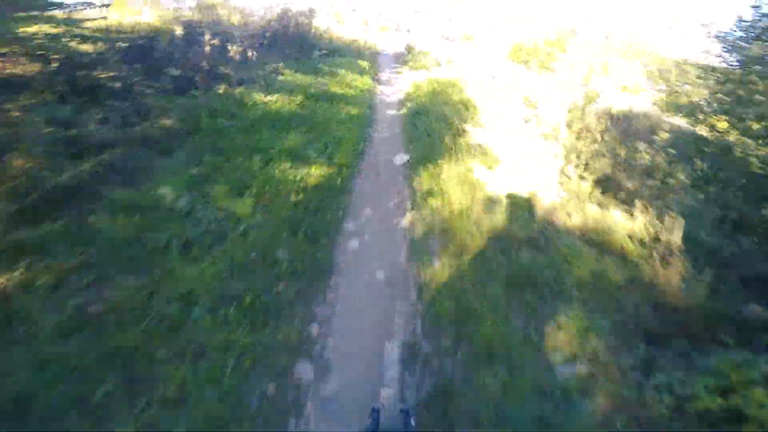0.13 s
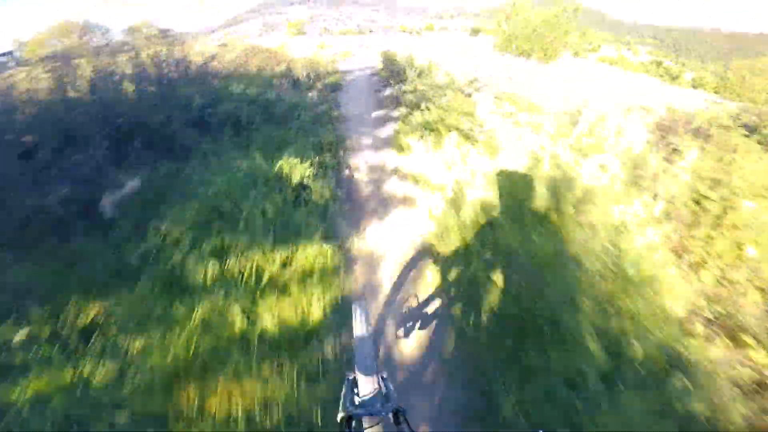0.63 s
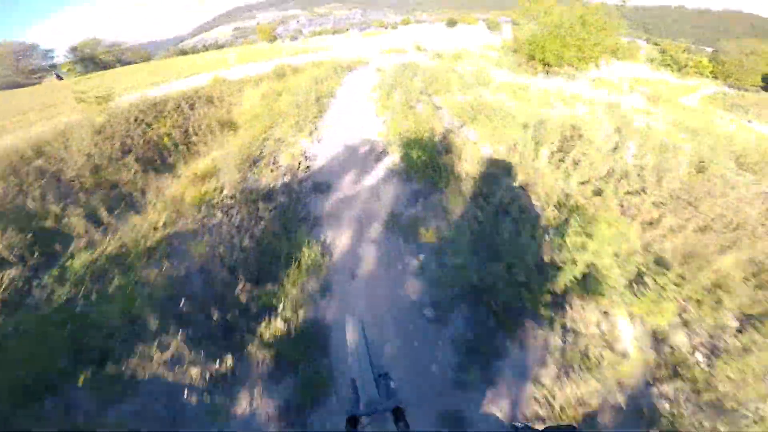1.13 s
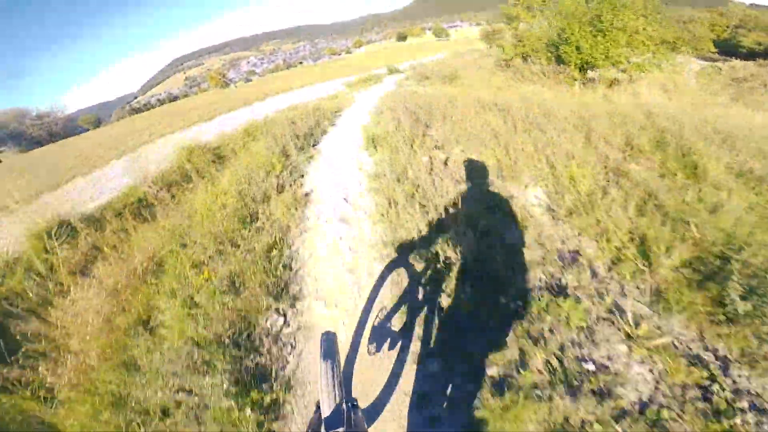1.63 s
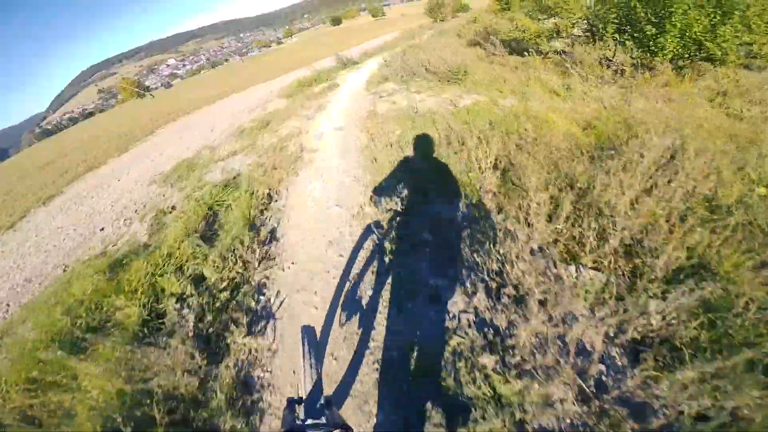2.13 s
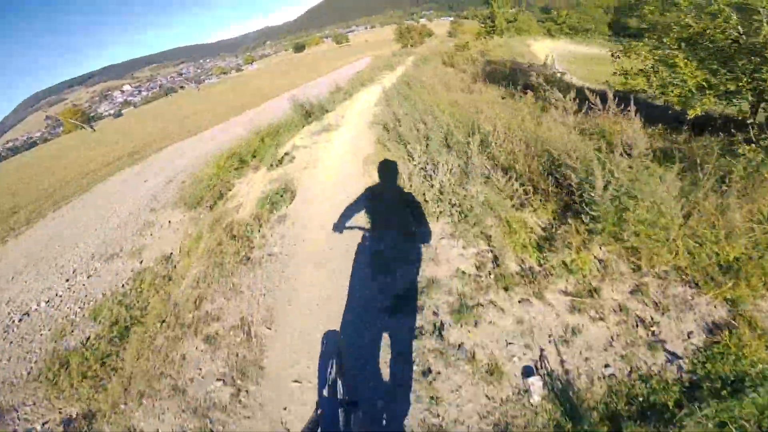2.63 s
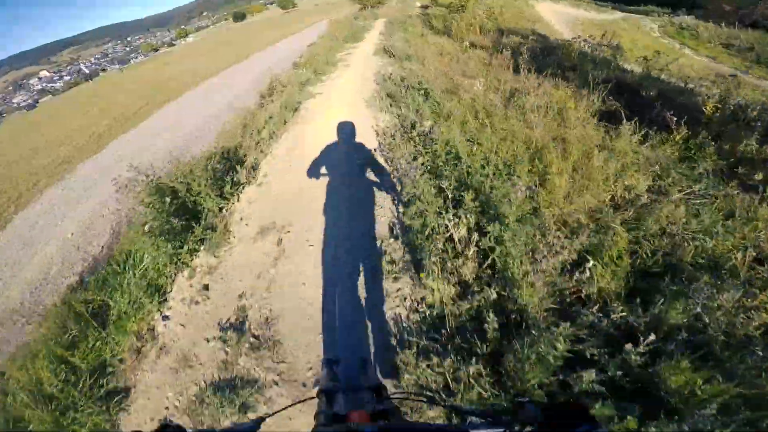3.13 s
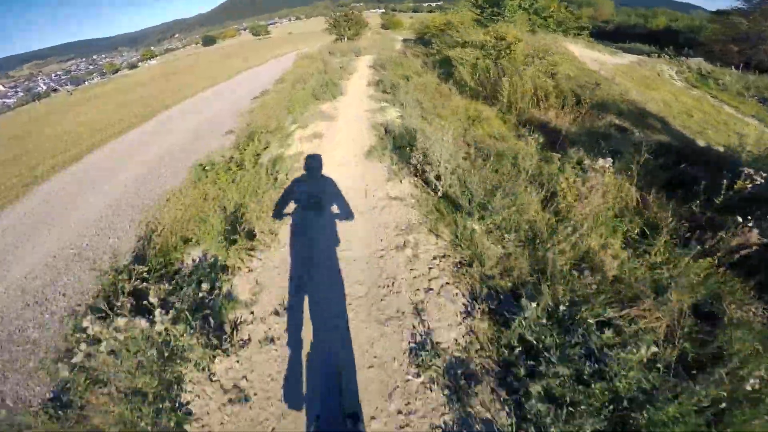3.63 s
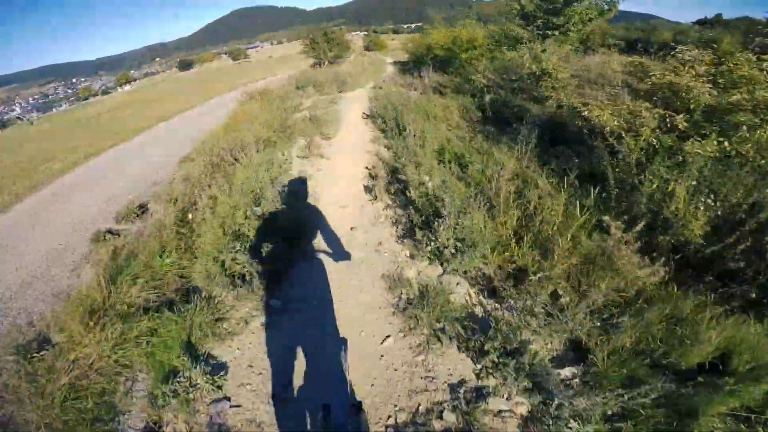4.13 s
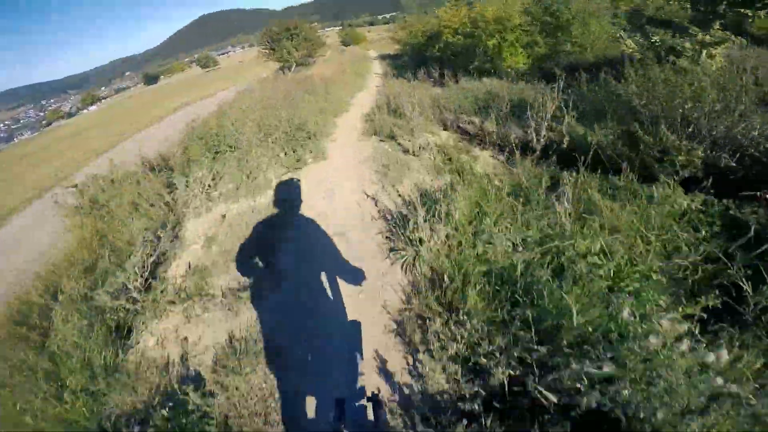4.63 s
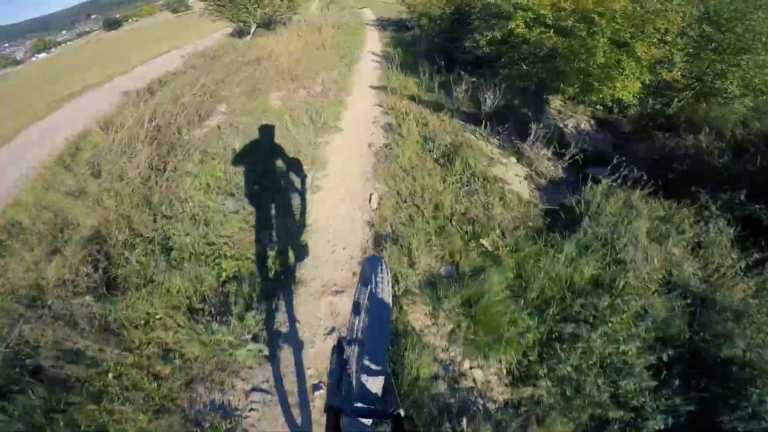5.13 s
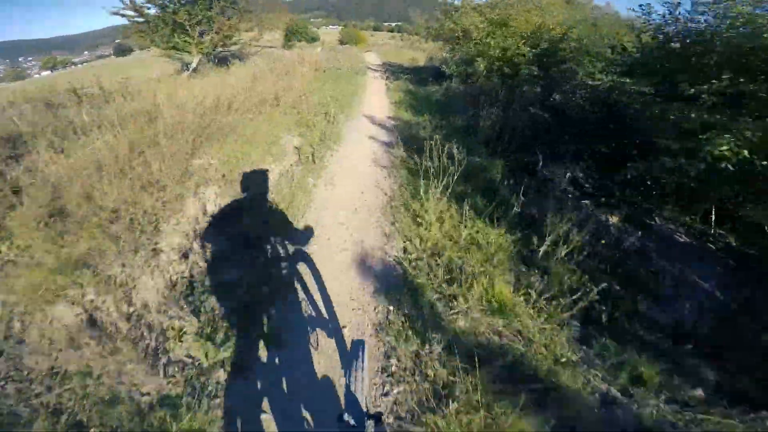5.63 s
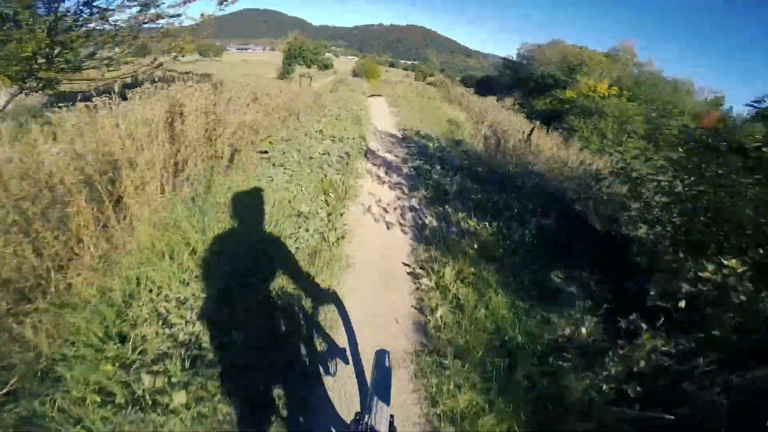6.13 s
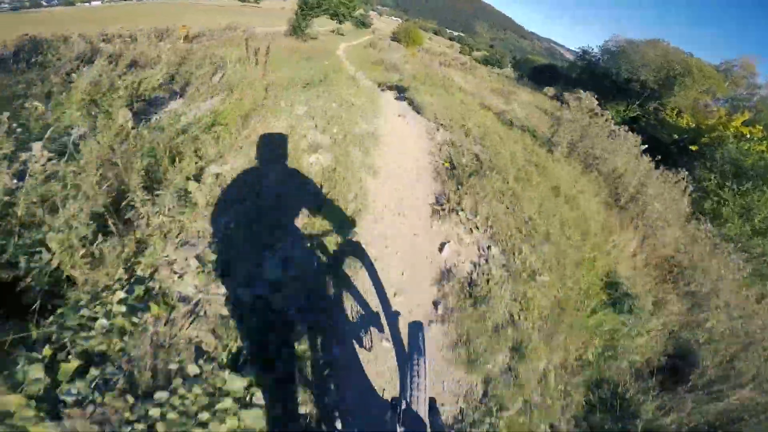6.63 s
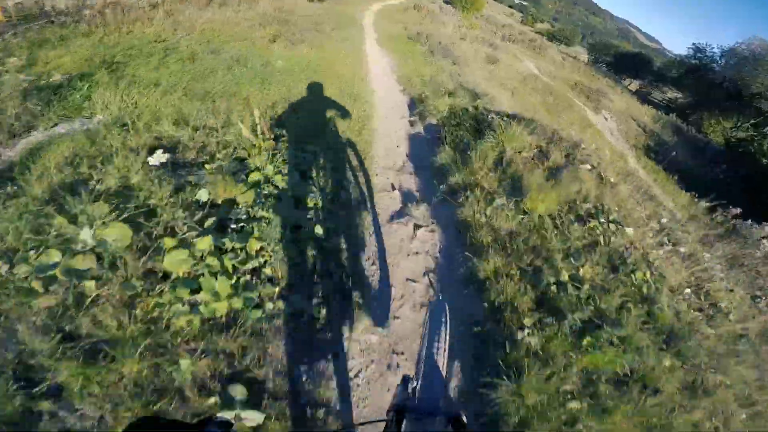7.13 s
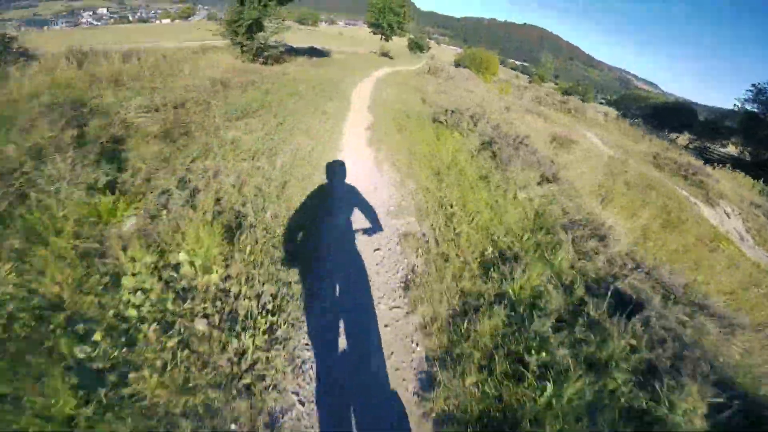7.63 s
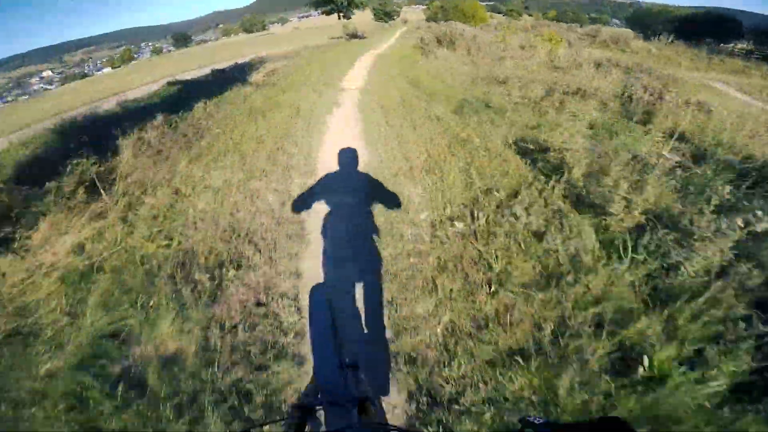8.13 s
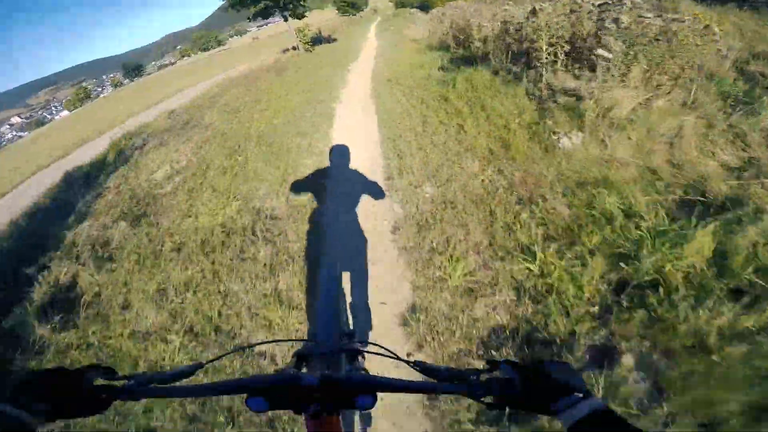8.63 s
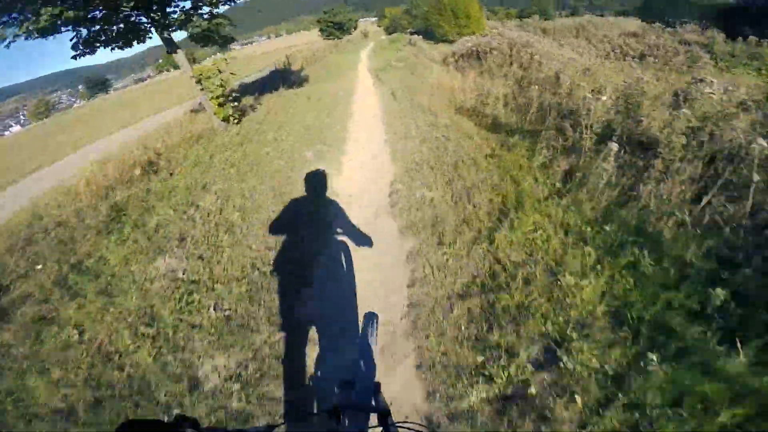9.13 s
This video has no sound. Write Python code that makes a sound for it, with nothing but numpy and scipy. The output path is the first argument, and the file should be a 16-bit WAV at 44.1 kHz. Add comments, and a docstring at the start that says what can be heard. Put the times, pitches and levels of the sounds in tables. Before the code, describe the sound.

Fast mountain bike ride heard from the rider: low throbbing wind, hissing tyres on gravel, chain rattle and irregular clacks and clinks.

```python
"""Mountain bike on a dirt trail

A bike runs fast downhill, heard from a small camera on the rider. Wind is noise shaped by spectra
and moving levels: it rumbles, throbs and buffets, with low puffs and short gritty scrapes on top.
The tyres roar and hiss as patchy short-time noise. Chain, grit and stones clatter on the frame:
short noise bursts excite decaying resonances, in single loud blows and in a random patter that
thickens as the gravel crunch grows louder."""
import sys
import numpy as np
from scipy import signal
from scipy.fft import rfft, irfft, next_fast_len
from scipy.io import wavfile
from scipy.ndimage import uniform_filter1d

SR = 44100
rng = np.random.default_rng(int(sys.argv[2]) if len(sys.argv) > 2 else 0)


def pcm_store(signal):
    """Save signal as 16-bit PCM."""
    levels = np.round(np.clip(np.atleast_2d(signal), -1, 1) * 32767)
    wavfile.write(sys.argv[1], SR, levels.astype(np.int16).T)


def how_loud(loudness_db):
    """Turn decibels into a plain amplitude multiplier (0 dB gives 1, 20 dB gives 10)."""
    steps = np.asarray(loudness_db, float) / 20
    return 10 ** steps


N = 408366  # samples

# levels of wind buffeting and of gravel crunch: start_s, buffet_db, crunch_db
BUFFET_AND_CRUNCH = [(0.0, -33, -31), (0.2, -21, -33), (0.3, -23, -37.5), (0.5, -32, -42), (1.31, -34, -38),
                     (1.38, -27.5, -31), (1.62, -31.5, -35.5), (1.94, -36, -41), (2.05, -22.5, -35.5),
                     (2.27, -26.5, -35), (2.53, -24.5, -42), (3.25, -28.5, -39), (3.53, -18.5, -28.5),
                     (3.87, -28, -42), (4.13, -21, -34.5), (4.28, -26, -37), (4.32, -20, -32),
                     (4.58, -23.5, -36), (4.72, -32, -38), (5.16, -27.5, -44), (5.31, -23, -32),
                     (5.42, -25.5, -25), (5.62, -28, -33), (5.88, -21, -27), (6.03, -28, -30.5),
                     (6.37, -27, -40), (7.07, -20, -29.5), (7.71, -26, -29), (8.15, -26, -35),
                     (8.52, -31.5, -31.5), (8.66, -34, -43.5), (9.03, -31.5, -27.5), (9.26, -31, -41.5)]


def evened(x):
    """Normalises the mean power: rms 1."""
    return x / np.sqrt(np.mean(x ** 2) + 1e-20)


def read(points, hz):
    """Interpolates a spectrum on a log-frequency axis, as hearing spaces pitch."""
    f, value = np.transpose(points)
    return np.interp(np.log(hz + 1), np.log(f + 1), value)


def filtered(x, points):
    """Linear filtering: the spectrum of x is multiplied by a gain curve of (Hz, dB) points."""
    size = next_fast_len(len(x))
    gain = how_loud(read(points, np.fft.rfftfreq(size, 1 / SR)))
    return irfft(rfft(x, size) * gain, size)[:len(x)]


def coloured_noise(points, envelope=1):
    """Subtractive synthesis: white noise under an envelope, filtered by a spectrum, rms 1."""
    return evened(filtered(rng.standard_normal(N) * envelope, points))


def lumps(seconds):
    """Low-passed randomness: noise averaged twice over the given time, rms 1."""
    span = max(round(seconds * SR), 2)
    once = uniform_filter1d(rng.standard_normal(N), span)
    return evened(uniform_filter1d(once, span))


def follow(table):
    """Piecewise-linear envelopes: the columns of a table, sample by sample."""
    s, *columns = np.transpose(table)
    return [np.interp(np.arange(N) / SR, s, c) for c in columns]


def add(mix, s, sound):
    """Superposition: mixes a sound in at second s."""
    part = mix[round(s * SR):][:len(sound)]
    part += sound[:len(part)]


def gliding(x, octaves, seconds):
    """Frozen turbulence: eddies pass faster or slower as air speed wanders, so their pitch glides."""
    speed = 2 ** (octaves * lumps(seconds))
    return np.interp(np.cumsum(speed) * (N - 1) / speed.sum(), np.arange(N), x)


def wind(gust):
    """Turbulent pressure on the microphone: large eddies rumble, smaller ones throb."""
    # wind strength: start_s, rumble_db, throb_db
    wind_levels = [(0.0, -19.5, -23), (2.5, -19, -18.5), (2.73, -17, -11), (2.84, -17.5, -22.5),
                   (3.22, -25.5, -17.5), (3.51, -14.5, -20.5), (4.18, -19.5, -19.5), (4.33, -17, -18.5),
                   (5.08, -22, -21), (5.31, -18, -14.5), (6.5, -18.5, -21), (6.83, -25, -13),
                   (7.14, -12.5, -18), (7.4, -17.5, -20.5), (7.79, -13, -16), (8.79, -19.5, -21),
                   (8.85, -13.5, -17), (9.26, -14.5, -19)]
    # spectrum of the large eddies: frequency_hz, level_db
    rumble_spectrum = [(12, -39), (22, -12), (40, 5), (60, 4.5), (85, -4.5), (130, -14.5), (300, -104)]
    # spectrum of the smaller eddies: frequency_hz, level_db
    throb_spectrum = [(50, -22), (85, -2), (120, -1), (190, -14), (300, -21.5), (700, -107)]
    rumble_db, throb_db = follow(wind_levels)
    rumble = coloured_noise(rumble_spectrum)
    throb = gliding(coloured_noise(throb_spectrum), octaves=0.3, seconds=0.16)
    throb = evened(throb * how_loud(2.0 * gust))
    return how_loud(rumble_db) * rumble + how_loud(throb_db) * throb


def buffeting_and_crunch(gust):
    """Amplitude-modulated noise: wind buffeting and gravel crunch in uneven lumps, partly together."""
    # spectrum of the buffeting: frequency_hz, level_db
    buffet_spectrum = [(95, -38.5), (175, 0), (400, -9), (800, -20), (1500, -33), (4000, -75)]
    # spectrum of the gravel crunch: frequency_hz, level_db
    crunch_spectrum = [(400, -2), (750, -4), (1100, -3.5), (1500, -7.5), (2200, -29), (5000, -73)]
    buffet_db, crunch_db = follow(BUFFET_AND_CRUNCH)
    jolt = lumps(0.0034)  # shared by both
    buffet = coloured_noise(buffet_spectrum, how_loud(1.67 * jolt))
    buffet = evened(gliding(buffet, octaves=0.3, seconds=0.07) * how_loud(2.45 * gust))
    unevenness_db = 0.36 * jolt + 1.66 * lumps(0.0036) + 0.83 * gust + 1.0 * lumps(0.061)
    crunch = coloured_noise(crunch_spectrum, how_loud(unevenness_db))
    return how_loud(buffet_db) * buffet + how_loud(crunch_db) * crunch


def puffs_and_scrapes():
    """Enveloped noise: low puffs of wind and short gritty scrapes, each swelling with a sharper edge."""
    # swelling bursts: start_s, peak_db, edge_db (sets the treble of the burst), rise_ms
    bursts = [(0.64, -11, -16, 8.4), (0.665, -9.5, -16.5, 5.9), (0.685, -12, -8, 4.4),
              (1.011, -12, -31, 3.2), (1.359, -13.5, -7, 5.9), (1.383, -5.5, -13, 2.5),
              (1.411, -10.5, -20, 3.2), (1.45, -6, -12, 2.4), (1.622, -5, -14, 2.8), (2.038, -12, -29, 5),
              (2.271, -13, -7, 5.8), (2.293, -10, -24, 2.1), (2.425, -9.5, -7, 5.6),
              (2.709, -6.5, -16, 7.4), (3.473, -7, -19, 5.5), (3.493, -4.5, -5, 3), (3.557, -2.5, -16, 2.8),
              (3.712, -12, -11, 6.7), (3.972, -7.5, -19, 1.4), (4.134, -0.5, -40, 11), (4.303, -12, -14, 2),
              (4.315, -12, -11, 1.9), (4.333, -12, -15, 3.1), (4.428, -17, -5, 4), (4.471, -10.5, -13, 3.4),
              (4.517, -2.5, -37, 8.6), (4.966, -12.5, -25, 5), (5.326, -5.5, -24, 6),
              (5.362, -4.5, -16, 1.5), (5.387, -8, -15, 4.2), (5.521, -5, -17, 2.8), (5.538, -3, -26, 9.7),
              (5.677, -5.5, -19, 4.5), (5.892, -1.5, -11.5, 4.7), (5.928, -8, 0, 8.6), (5.942, 0, -8, 2.7),
              (5.965, -6, -3, 2.8), (6.039, -2.5, -9.5, 3.5), (6.39, -12.5, -9, 2.5), (6.572, -9, -14, 8.6),
              (7.012, -8, -18, 2), (7.049, -11.5, 3, 3.9), (8.518, -8, -15, 5.2), (8.818, -5.5, -16.5, 7.6),
              (8.91, -9.5, -13, 5.9), (8.952, -4.5, -25, 3.1)]
    out, chance = np.zeros(N), rng.standard_normal((len(bursts), 3000))
    for (s, peak_db, edge_db, rise_ms), noise in zip(bursts, chance):
        u = np.arange(3000) / SR * 1000 / rise_ms
        burst = filtered(noise, [(90, 6.0), (200, 7.5), (400, -0.5), (750, 0.51 * edge_db + 1.5),
                                 (1000, edge_db + 3.5), (1500, edge_db - 4.5),
                                 (2300, edge_db - 15.5), (6000, -65)])
        burst = burst * u * np.exp(1 - u)  # the envelope peaks after rise_ms
        add(out, s, how_loud(peak_db) * burst / abs(burst).max())
    return out


def tyres():
    """Short-time spectral synthesis of dirt crunch: patchy noise whose bands swell on their own."""
    # swell of each band; only departures from a column's mean count:
    # start_s, roar_db, swish_db, hiss_db, grit_db
    tyre_levels = [(0.0, -35.5, -38.5, -38.5, -47.5), (0.67, -42, -42, -50.5, -63),
                   (1.11, -40.5, -42.5, -46, -57.5), (2.24, -40, -42, -48.5, -63.5),
                   (2.73, -40.5, -46, -51.5, -69.5), (3.22, -37, -46.5, -51, -69.5),
                   (3.82, -45, -44, -50, -64), (4.62, -37.5, -44.5, -47.5, -64),
                   (5.31, -39.5, -49, -53.5, -64.5), (5.53, -30.5, -45, -45, -66),
                   (5.839, -28.5, -42.5, -49.5, -64), (6.02, -41.5, -45.5, -49.5, -65.5),
                   (6.42, -42.5, -47, -51.5, -65.5), (6.76, -32, -40, -44, -61), (7.12, -36, -46, -51, -62),
                   (7.76, -36.5, -38.5, -41.5, -61), (7.99, -39, -46, -48, -63.5),
                   (8.2, -40, -44.5, -50, -64), (8.36, -35.5, -41.5, -45, -62),
                   (8.63, -46.5, -46.5, -48, -62.5), (9.001, -34, -38.5, -44, -58),
                   (9.26, -39, -45.5, -50.5, -60.5)]
    # spectrum of rolling: frequency_hz, level_db
    roll_spectrum = [(820, -33.5), (1500, -4), (1900, -4), (2300, -2), (2700, -7), (3130, -12), (4360, -7),
                     (5950, -11.5), (6430, -13.5), (7390, -24.5), (8780, -26.5), (11100, -42), (14400, -75),
                     (22000, -120)]
    # centres of roar, swish, hiss and grit, one value each: centre_hz
    band_centres = (2670, 4600, 6100, 8800)
    count, hz = N // 128 + 5, np.fft.rfftfreq(512, 1 / SR)
    t = np.arange(count) * 128 / SR
    real, imaginary, patches = rng.standard_normal((count, len(hz), 3)).T
    patches = uniform_filter1d(patches, 7, 0)  # smoothed across frequency
    patches = evened(uniform_filter1d(patches, 8, 1))  # and across time
    # stones shake all bands at once
    flicker_db = np.interp(t, np.arange(N) / SR, 1.26 * lumps(0.007) + 1.07 * lumps(0.096))
    s, *columns = np.transpose(tyre_levels)
    swell_db = np.array([np.interp(t, s, c - np.mean(c)) for c in columns])
    # share of each band at each frequency
    blend = np.array([read(list(zip(band_centres, one)), hz) for one in np.eye(len(band_centres))])
    level_db = read(roll_spectrum, hz)[:, None] + blend.T @ swell_db + 1.56 * patches + flicker_db
    spectra = (real + 1j * imaginary) * how_loud(level_db)
    crunch = signal.istft(spectra, nperseg=512, noverlap=384)[1][:N]
    return how_loud(-37.0) * evened(crunch)


def damped_resonance(hz, width_hz, noise):
    """Impulse response of one resonance: a sudden hit and brief scrape make it ring; peak 1."""
    t = np.arange(1500) / SR
    hit = np.exp(-t[:len(noise)] / 0.0019) * (0.13 * noise)
    hit[0] = 1
    u = 3.05 * width_hz * t  # a wider resonance dies away sooner
    ring = np.convolve(hit, u * np.exp(-u) * np.cos(2 * np.pi * hz * t))
    ring = signal.lfilter(*signal.butter(2, 3600, fs=SR), ring)  # dulled by the camera case
    return ring / abs(ring).max()


def gravel():
    """Random point process: small gravel scatters all the time, denser as the crunch grows louder."""
    crunch_db = follow(BUFFET_AND_CRUNCH)[1]
    busy = how_loud(0.63 * (crunch_db - crunch_db.mean()) + 4.0 * lumps(0.05))
    hits = rng.random(N) < 700 * busy / SR  # 700 a second where busy is 1
    size = how_loud(2.7 * np.minimum(rng.exponential(1, N), 3)) * hits
    kinds = 16
    kind, noise = rng.integers(0, kinds, N), rng.standard_normal((kinds, 300))
    relative_width = rng.uniform(0.14, 0.92, kinds)
    # spread around two hollow rings of the camera case
    pitch_hz = np.repeat((1113, 2300), kinds // 2) * rng.uniform(0.774, 1.143, kinds)
    patter = np.zeros(N)
    for k, hz in enumerate(pitch_hz):
        grain = damped_resonance(hz, hz * relative_width[k], noise[k])
        patter += signal.oaconvolve(size * (kind == k), grain)[:N]
    return how_loud(-40) * evened(patter)


def clicks_and_clinks():
    """Damped resonance: knocks and stones on the frame; a wide one clicks, a narrow one clinks."""
    # knocks and stones on the frame, one resonance each: start_s, peak_db, pitch_hz, width_hz
    strikes = [(0.176, -24, 1440, 500), (0.196, -15, 2200, 600), (0.509, -20, 1380, 250),
               (0.532, -15.5, 1700, 900), (0.9128, -24, 1400, 400), (0.934, -23, 1360, 400),
               (1.0944, -11, 1680, 1300), (1.4306, -21, 1340, 300), (1.532, -22, 3660, 400),
               (1.532, -14.5, 1300, 1500), (2.193, -22, 1210, 500), (3.08, -29, 2380, 110),
               (3.106, -29, 2300, 110), (3.325, -24.5, 1400, 90), (3.329, -30, 2270, 90),
               (3.3873, -11.5, 1500, 1800), (3.4954, -9, 1200, 1600), (4.107, -15.5, 1500, 900),
               (4.367, -13.5, 950, 1110), (4.4065, -28, 1350, 300), (4.436, -21, 1880, 400),
               (4.6374, -28, 1300, 120), (4.664, -23, 1120, 300), (4.755, -24, 2500, 700),
               (5.957, -17, 1470, 250), (6.2073, -26, 1390, 500), (6.343, -21, 1500, 497),
               (7.76, -20, 2340, 600), (8.255, -20, 2250, 600), (8.5944, -24.5, 1460, 500),
               (8.861, -20, 1090, 250), (8.971, -19.5, 2120, 400), (9.011, -21, 1200, 400)]
    out = np.zeros(N)
    for (s, peak_db, hz, width_hz), noise in zip(strikes, rng.standard_normal((len(strikes), 300))):
        add(out, s, how_loud(peak_db) * damped_resonance(hz, width_hz, noise))
    return out


def knock(noise, chatter_s, ring_db, thud_hz, thud_db, clack_db, ping_db):
    """Modal excitation: a broad crack of a few milliseconds leaves a faint ring in the frame."""
    # frame modes behind the camera case: pitch_hz, level_db, t60_s
    frame_modes = [(1370, -7, 0.016), (1660, 12.5, 0.011), (2600, 6, 0.0037), (4690, -3, 0.086),
                   (6000, 11, 0.009), (8700, 0.5, 0.014)]
    t = np.arange(1000) / SR
    hz, mode_db, t60 = (c[:, None] for c in np.transpose(frame_modes))
    ring = (how_loud(ring_db + mode_db - 60 * t / t60) * np.sin(2 * np.pi * hz * t)).sum(0)
    ring[0] = 1  # the crack itself
    u = np.arange(len(noise)) / SR / chatter_s
    crack = noise * np.sqrt(u) * np.exp(-u)
    blow = np.pad(np.convolve(crack, ring), (200, 448))  # room for the filter to spread
    # the camera case dulls the top; levels are relative to the tick near 6 kHz
    return filtered(blow, [(.5 * thud_hz, thud_db - 27.5), (0.86 * thud_hz, thud_db - 7.5),
                           (thud_hz, thud_db), (min(1.21 * thud_hz, 2900), thud_db - 5.0),
                           (3500, clack_db), (4700, clack_db), (5200, 0), (6600, 0),
                           (7400, ping_db), (9300, ping_db),
                           (11000, ping_db - 22), (14000, ping_db - 36.0)])


def rattle():
    """Random point process: small ticks of chain and thrown grit, denser as the crunch grows louder."""
    crunch_db = follow(BUFFET_AND_CRUNCH)[1]
    busy = how_loud(1.5 * (crunch_db - crunch_db.mean()))
    hits = rng.random(N) < 90 * busy / SR  # 90 a second where busy is 1
    size = how_loud(3.6 * np.minimum(rng.exponential(1, N), 3)) * hits
    kinds = 12
    kind, noise = rng.integers(0, kinds, N), rng.standard_normal((kinds, 400))
    tone_db = 3.9 * rng.standard_normal((kinds, 3)) + [14, -4, -16]  # thud, clack, ping
    ticks = np.zeros(N)
    for k in range(kinds):
        tick = knock(noise[k], 0.0013, -28.5, 1200 + 110 * k, *tone_db[k])
        ticks += signal.oaconvolve(size * (kind == k), tick)[:N]
    return how_loud(-47.5) * evened(ticks)


def knocks():
    """Impact spectra of loud blows over bumps: mostly dull on the frame, bright from the chain."""
    # knocks on the frame, mostly dull, one bright and sharp at 3.496 s:
    # start_s, peak_db, thud_hz, clack_db (re thud), tick_db (re thud)
    frame_knocks = [(0.1959, -14.5, 1130, -17, -14), (2.928, -15.5, 2300, -10, -12),
                    (3.0104, -22, 2300, -22, -24), (3.056, -23, 2220, -14, -28),
                    (3.496, -13.5, 2500, -4, -3), (4.466, -20, 1610, -13, -16),
                    (6.11, -17.5, 1790, -33, -28.5), (6.8175, -17, 2150, -22, -30)]
    # bright ticks of the chain: start_s, peak_db, ping_db (re tick)
    chain_ticks = [(0.2598, -26.5, -0.5), (3.016, -28, -1), (3.293, -28.5, -23), (3.3592, -17.5, -18),
                   (3.4486, -25, -22), (4.382, -15.5, -19), (5.933, -24.5, -7), (7.762, -22, -31)]
    # each blow: s, peak dB, thud Hz, then thud, clack and ping in dB re tick
    blows = [(s, peak_db, hz, -tick_db, clack_db - tick_db, -20)
             for s, peak_db, hz, clack_db, tick_db in frame_knocks]
    blows += [(s, peak_db, 1300, -2, -8, ping_db) for s, peak_db, ping_db in chain_ticks]
    out, chance = np.zeros(N), rng.standard_normal((len(blows), 600))
    for (s, peak_db, *parts), noise in zip(blows, chance):
        blow = knock(noise, 0.0033, -37.0, *parts)
        add(out, s - 200 / SR, how_loud(peak_db) * blow / abs(blow).max())  # skips the padding
    return out


def scene():
    """Superposition of wind, tyres and frame at one microphone."""
    gust = lumps(0.021)  # shared by throb, buffeting and crunch
    background = wind(gust) + buffeting_and_crunch(gust) + puffs_and_scrapes()
    bike = tyres() + gravel() + clicks_and_clinks() + rattle() + knocks()
    return (background + bike)[None]


def low_pass(x):
    """Removes everything above the highest recorded frequency."""
    return signal.sosfilt(signal.butter(12, 11250, fs=SR, output="sos"), x)


def record(dry):
    """Dynamic compression: a limiter cuts the gain at strong blows, lets go soon after, then saturates."""
    power_db = 10 * np.log10(abs(uniform_filter1d(dry[0] ** 2, 300)) + 1e-12)
    fall_db = np.arange(N) * 20.0 / SR  # the held level falls 20 dB a second
    held_db = np.maximum.accumulate(power_db + fall_db) - fall_db
    over_db = np.maximum(held_db + 8.0, 0)  # threshold -8 dB
    limited = dry / how_loud(0.41 * uniform_filter1d(over_db, 150))
    return low_pass(1.284 * np.tanh(limited / 1.122))


dry = scene()
out = record(dry)
pcm_store(out)
```